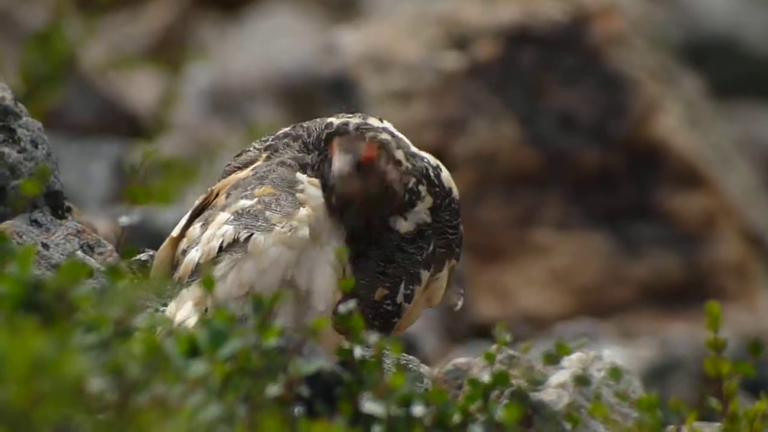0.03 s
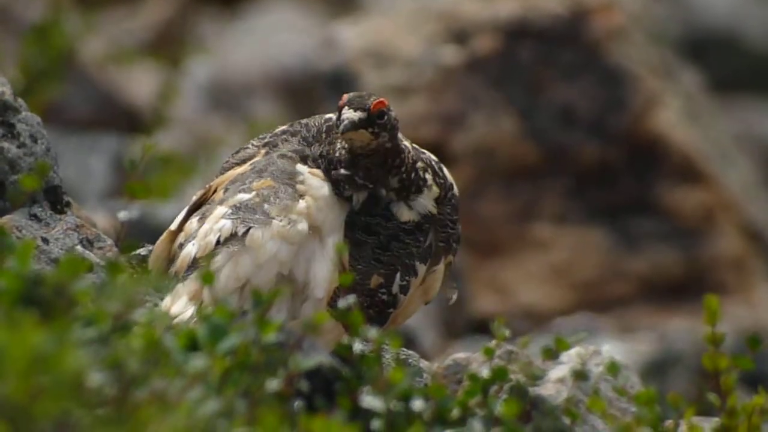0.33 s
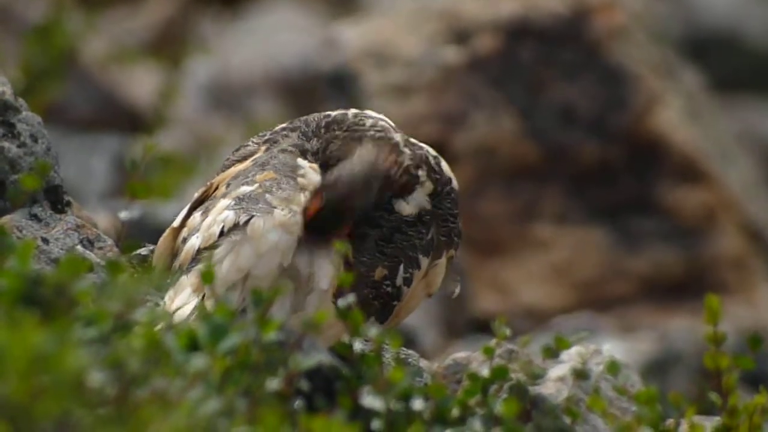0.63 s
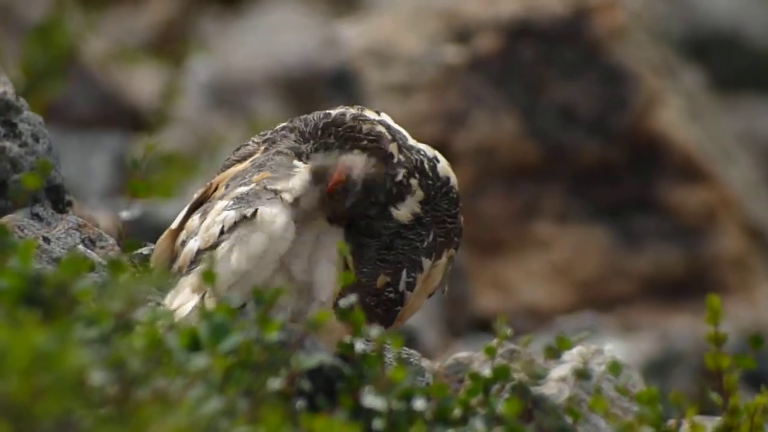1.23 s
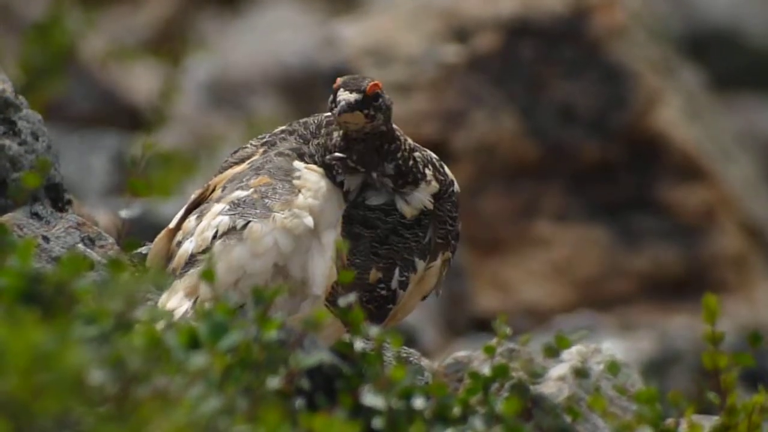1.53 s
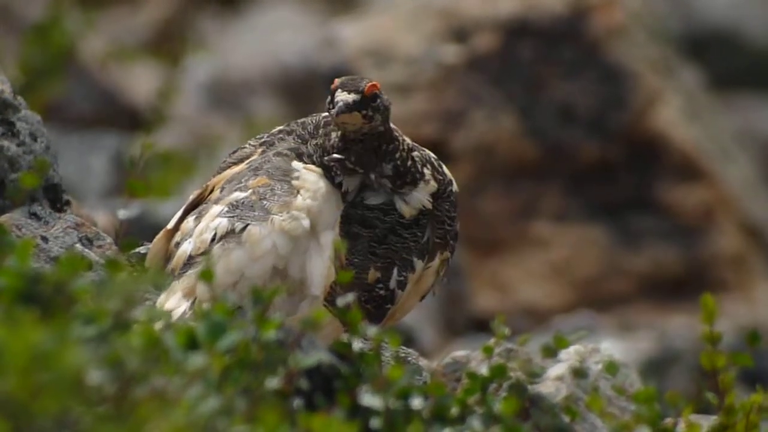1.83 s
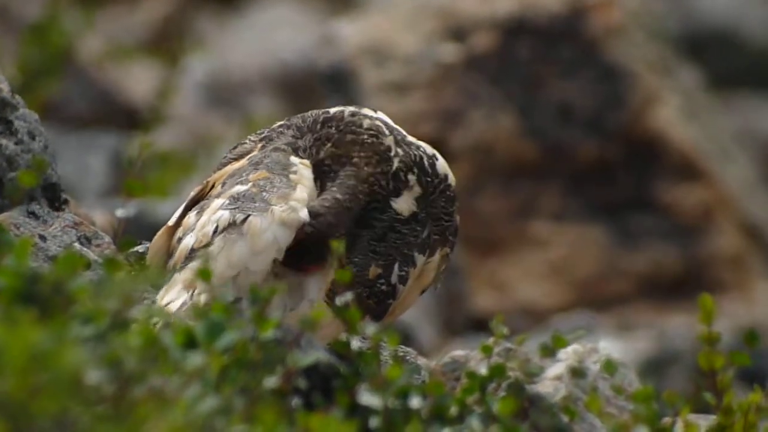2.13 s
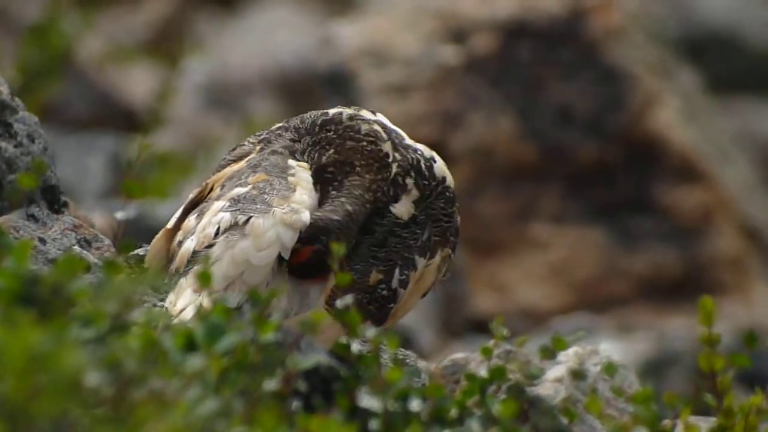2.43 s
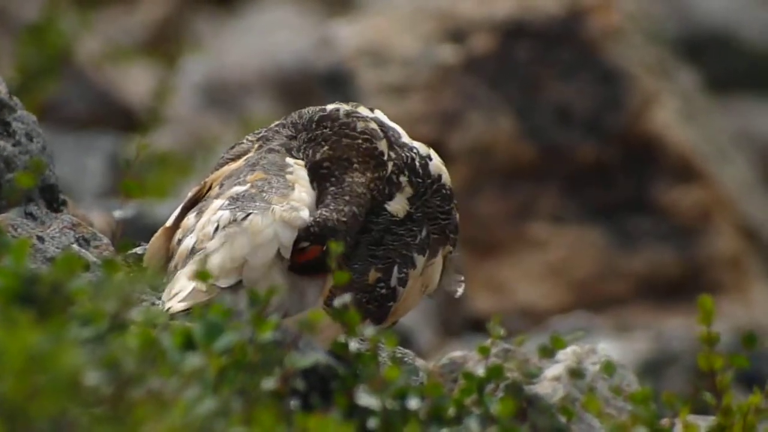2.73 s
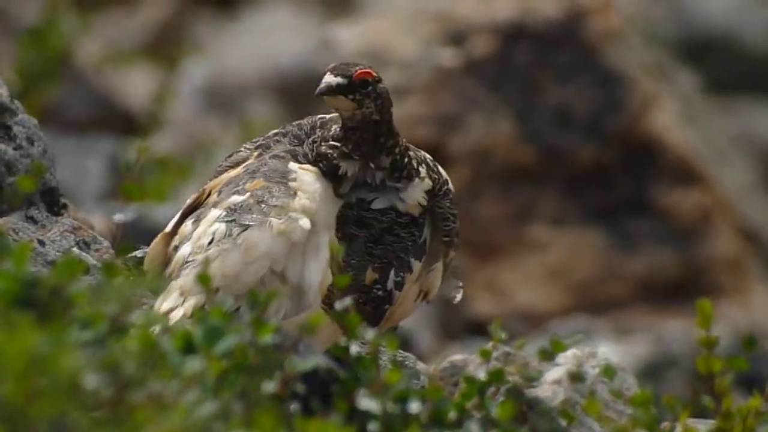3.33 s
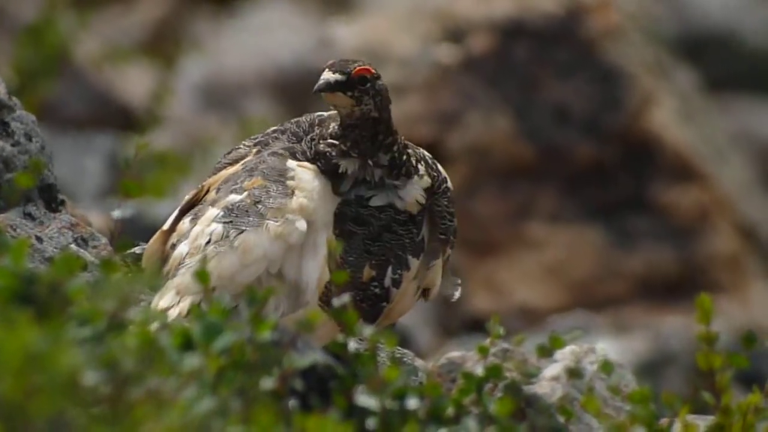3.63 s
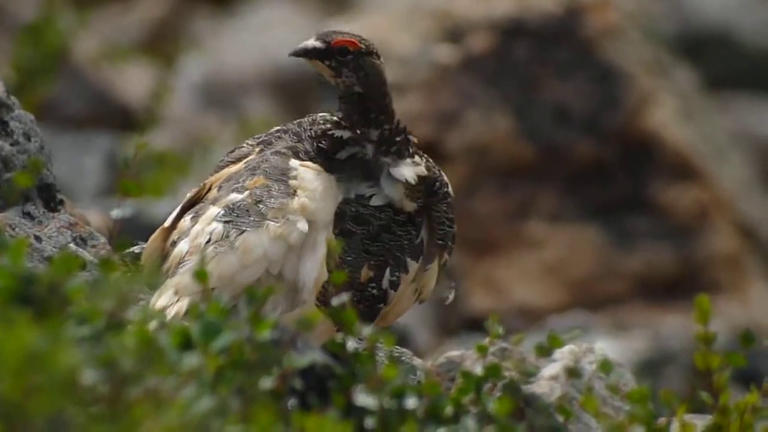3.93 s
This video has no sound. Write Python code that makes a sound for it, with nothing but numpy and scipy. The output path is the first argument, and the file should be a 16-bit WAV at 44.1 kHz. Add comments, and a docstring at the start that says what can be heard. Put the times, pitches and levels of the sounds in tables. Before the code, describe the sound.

A soft low bump on the microphone opens, with a few weaker ones trailing until 0.3 seconds. Faint distant wind rushes steadily across a quiet mountainside throughout, with light hiss and a very faint whine. A nearby preening bird makes tiny dry ticks at about 0.4, 1.8 and 2.8 seconds. Further slight bumps come around 1.6, 1.9, 2.4 and 3.3 seconds.

```python
"""A soft low bump on the microphone, then a steady rush of distant wind on a quiet mountainside.
Weaker bumps follow, each one pressure swing and a short shudder. A ptarmigan preens close by:
three tiny ticks, probably beak or twigs, each a cluster of contacts that ring and scrape.
The recorder adds its own hiss and a faint whine."""
import sys
import numpy as np
from scipy import signal
from scipy.fft import rfft, irfft
from scipy.io import wavfile

SR = 44100
rng = np.random.default_rng(int(sys.argv[2]) if len(sys.argv) > 2 else 0)


def generate_wav(signal):
    """Clip the signal to [-1, 1] and save it as 16-bit WAV at the path in sys.argv[1]."""
    frames = np.transpose(np.atleast_2d(signal))
    scaled = np.clip(frames, -1, 1) * 32767
    pcm = np.round(scaled).astype(np.int16)
    wavfile.write(sys.argv[1], SR, pcm)


N = 176400


def undb(db):
    """Decibels to gain."""
    return 10 ** (np.asarray(db) / 20)


def unit(x):
    """Scale to rms 1."""
    return x / np.sqrt(np.mean(x ** 2))


def shape(x, gain):
    """Filter by gain(f/Hz)."""
    f_hz = np.maximum(np.arange(N // 2 + 1) * SR / N, 1)
    return irfft(rfft(x) * gain(f_hz), N)


def noise(spectrum):
    """Noise, rms 1, shaped by (f/Hz, level/dB) points."""
    hz, db = np.array(spectrum).T
    white = rng.standard_normal(N)
    return unit(shape(white, lambda f: undb(np.interp(np.log(f), np.log(hz), db))))


def band_noise(hz, sigma_oct):
    """Noise, rms 1, in a bell-shaped band."""
    white = rng.standard_normal(N)
    return unit(shape(white, lambda f: np.exp(-.5 * (np.log2(f / hz) / sigma_oct) ** 2)))


def wander(rate_hz):
    """Smooth random drift, rms 1."""
    return unit(shape(rng.standard_normal(N), lambda f: np.exp(-(f / rate_hz) ** 2)))


def fade(age_s, decay_s):
    """Sudden start, exponential decay."""
    return (age_s >= 0) * np.exp(-np.abs(age_s) / decay_s)


def electronics(t):
    """Recorder electronics: even hiss and thin steady tones."""
    # hiss spectrum: f/Hz, relative density/dB
    hiss_spectrum = [(2000, 0.5), (4000, 0.5), (7000, 0)]
    # whine tones: f/Hz, rms level/dB
    tones = [(2667, -88), (3111, -85.5), (3556, -84.5), (6222, -89.5), (6667, -83)]
    hiss_db = -60
    whine = sum(undb(db) * np.sqrt(2) * np.sin(2 * np.pi * (hz * t + rng.random())) for hz, db in tones)
    return undb(hiss_db) * noise(hiss_spectrum) + whine


def wind(t):
    """Distant rush: octave bands swell together and flicker separately; mild gusts add to it."""
    # wind spectrum: f/Hz, relative density/dB
    rush_spectrum = [(20, -8), (40, -2.5), (70, -5), (110, -2.5), (165, 0), (240, -1.5), (320, -2.2),
                     (430, -5), (600, -5.5), (800, -9), (1100, -11), (1600, -15), (2500, -20.5),
                     (4000, -27), (8000, -52.5)]
    # gusts: centre t/s, sigma/s, f/Hz, level/dB
    gust_events = [(2.85, 0.073, 232, -54.5), (2.847, 0.053, 1000, -64), (3.935, .05, 1600, -64)]
    rush_db, swell_rms_db, flicker_rms_db = -52.5, .13, .5
    steady = noise(rush_spectrum)
    swell_db = swell_rms_db * wander(rate_hz=1.5)
    rush = gusts = 0
    for octave in range(4, 14):  # centres 16 to 8192 Hz
        band = shape(steady, lambda f: np.maximum(1 - np.abs(np.log2(f) - octave), 0))
        flicker_db = flicker_rms_db * wander(rate_hz=10)
        rush += band * undb(swell_db + flicker_db)
    for centre_s, sigma_s, hz, db in gust_events:
        envelope = np.exp(-.5 * ((t - centre_s) / sigma_s) ** 2)
        gusts += undb(db) * envelope * band_noise(hz, sigma_oct=.64)
    return undb(rush_db) * rush + gusts


def microphone_bumps(t):
    """Each bump: one rounded pressure swing, then a short low shudder."""
    # bumps: t/s, level/dB, f/Hz
    bumps = [(.023, -21.5, 104), (.104, -34.5, 100), (.181, -43.5, 60), (.224, -39, 89), (.286, -47.5, 75),
             (1.595, -38.5, 75), (1.855, -46, 75), (2.399, -47, 45), (3.271, -45.5, 50)]
    rumble = undb(-12.5) * band_noise(hz=67, sigma_oct=.76)
    out = 0
    for centre_s, db, hz in bumps:
        age_s = t - centre_s
        spread = (np.pi * hz * age_s) ** 2
        swing = (2 * spread - 1) * np.exp(-spread)
        shudder = rumble * np.clip(age_s * hz, 0, 1) * fade(age_s, decay_s=.03)
        out += undb(db) * (swing + shudder)
    return out


def preening_ticks(t):
    """Each tiny contact rings for a cycle or two, with a dry scrape around the same pitch."""
    # contacts in three clusters: t/s, level/dB, f/Hz
    contacts = [(0.36, -35, 6200), (0.3602, -35, 1700), (.3612, -40, 3800), (0.3627, -41, 3970),
                (1.7908, -37.5, 1380), (1.791, -43, 3470), (1.7935, -41, 1900), (2.8013, -40, 7600),
                (2.8066, -47, 7600)]
    decay_cycles, scrape_db = 1.1, -10.5
    out = 0
    for start_s, db, hz in contacts:
        age_s = t - start_s
        ring = np.sin(2 * np.pi * hz * age_s) * fade(age_s, decay_cycles / hz)
        scrape = undb(scrape_db) * band_noise(hz, sigma_oct=.89) * fade(age_s, decay_s=.0024)
        out += undb(db) * (ring + scrape)
    return out


def scene():
    """Wind, bumps, ticks, hiss and whine in mono."""
    t = np.arange(N) / SR
    return (wind(t) + microphone_bumps(t) + preening_ticks(t) + electronics(t))[None]


def record(dry):
    """Recorder: narrow treble notch, steep top roll-off, small DC offset."""
    notch_hz, notch_width_hz, notch_depth = 4380, 45, .75
    roll_off_hz, steepness, cutoff_hz = 7695, 11.84, 8800
    dc_offset = .014
    notched = shape(dry, lambda f: 1 - notch_depth * np.exp(-((f - notch_hz) / notch_width_hz) ** 2))
    dulled = shape(notched, lambda f: .5 ** ((f / roll_off_hz) ** steepness))
    low_pass = signal.ellip(8, .2, 70, cutoff_hz, fs=SR, output="sos")
    return signal.sosfilt(low_pass, dulled) + dc_offset


dry = scene()
out = record(dry)
generate_wav(out)
```